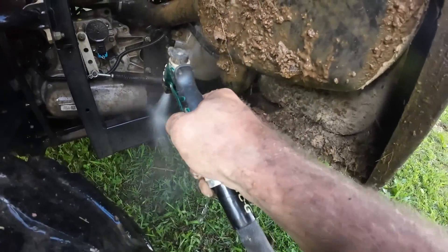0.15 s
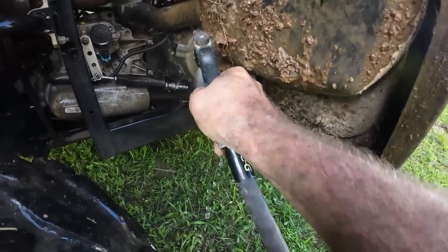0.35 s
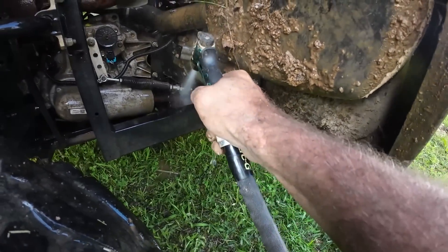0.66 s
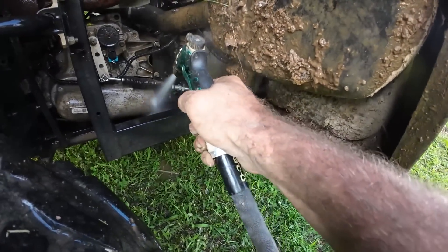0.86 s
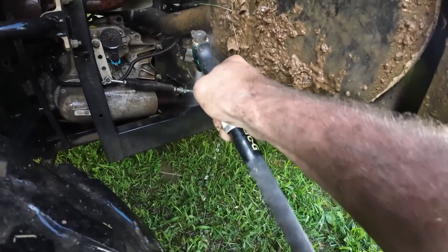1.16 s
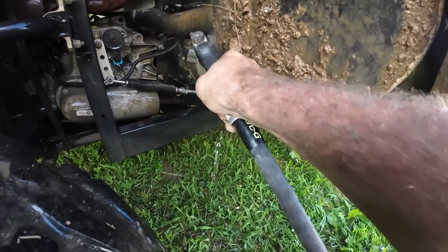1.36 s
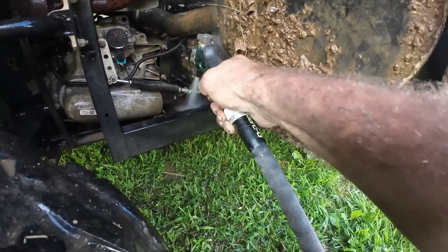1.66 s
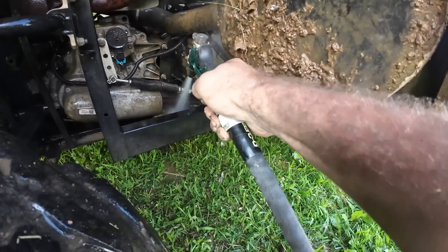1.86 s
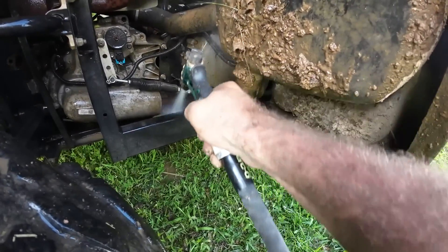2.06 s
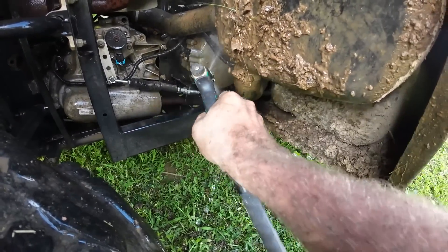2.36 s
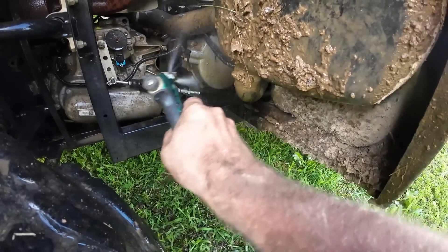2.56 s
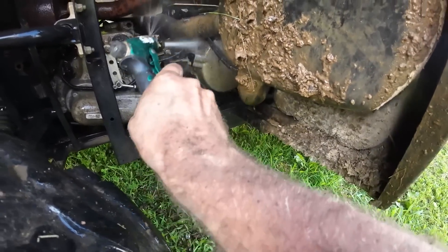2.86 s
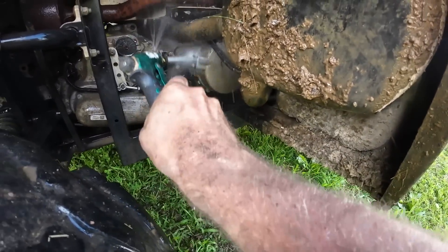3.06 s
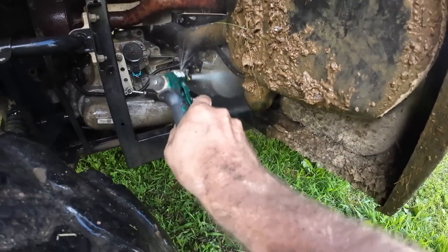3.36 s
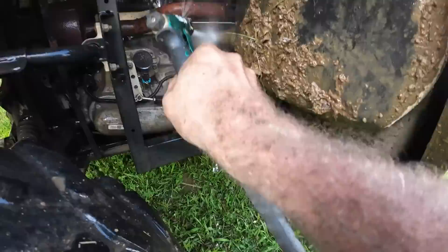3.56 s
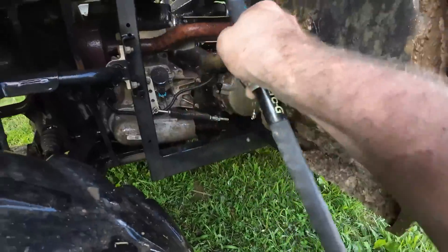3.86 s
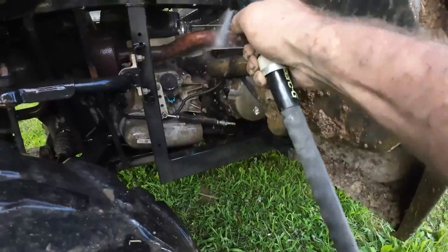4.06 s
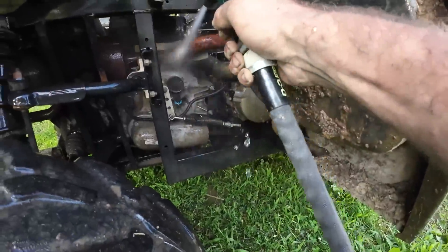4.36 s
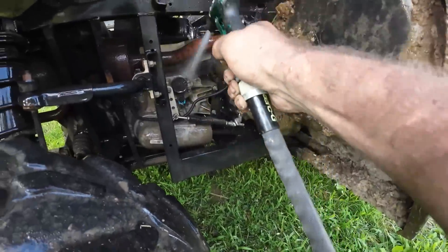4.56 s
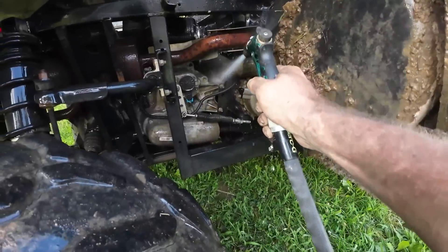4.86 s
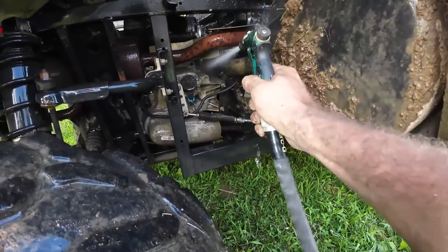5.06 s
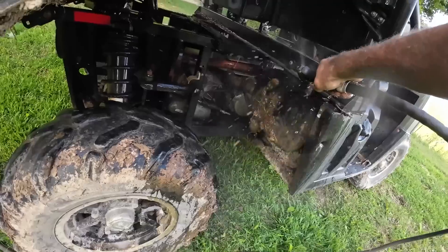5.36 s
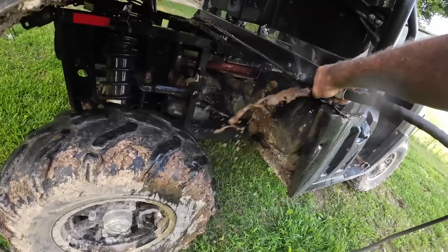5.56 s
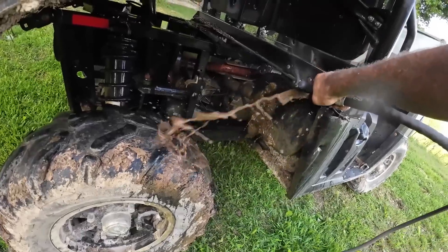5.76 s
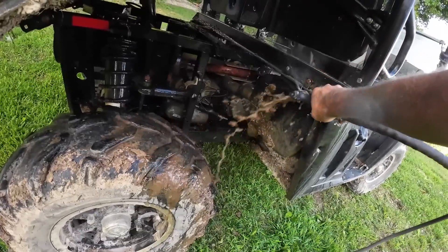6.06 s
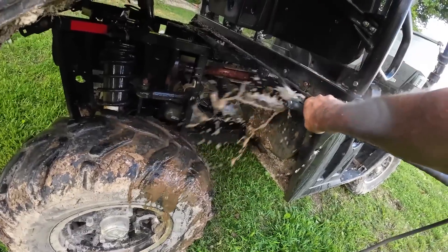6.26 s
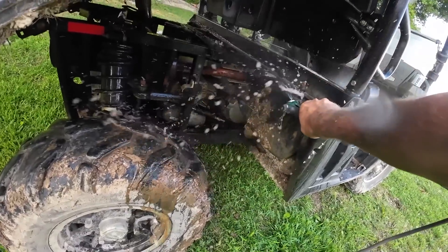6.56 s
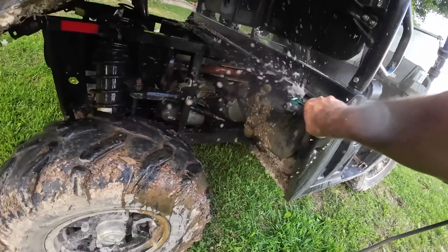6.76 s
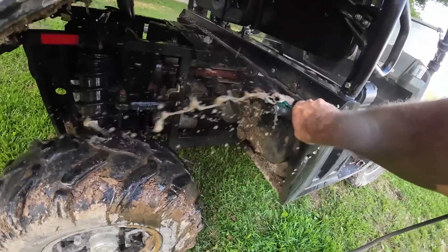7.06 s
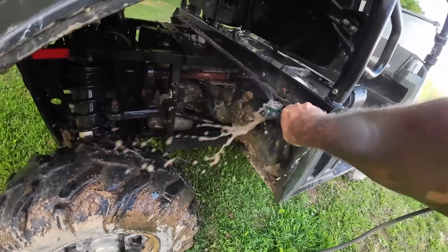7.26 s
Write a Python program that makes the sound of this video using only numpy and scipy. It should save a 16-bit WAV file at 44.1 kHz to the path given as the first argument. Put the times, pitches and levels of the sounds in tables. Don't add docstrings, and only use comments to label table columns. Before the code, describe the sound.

A hose nozzle jet hisses and drums loudly over a muddy vehicle frame outdoors, then turns softer and sputters as it sinks into mud.

```python
import sys
import numpy as np
from scipy import signal
from scipy.io import wavfile
from scipy.ndimage import uniform_filter1d

SR = 44100
rng = np.random.default_rng(int(sys.argv[2]) if len(sys.argv) > 2 else 0)


def wrap_up_sound(samples):
    columns = np.atleast_2d(samples).T
    tamed = np.clip(columns, -1, 1)
    steps = np.round(tamed * 32767).astype(np.int16)
    wavfile.write(sys.argv[1], SR, steps)


def to_linear_factor(level_db):
    exponent = np.asarray(level_db, float) / 20
    return 10 ** exponent


N = 326769
STEP_BACK_S = 5.301


def read(points, hz):
    f, value = np.transpose(points)
    return np.interp(np.log(hz + 1), np.log(f + 1), value)


def evened(x):
    return x / np.sqrt(np.mean(x ** 2) + 1e-20)


def by_place(pair, hz, t):
    close, far = read(pair[0], hz)[:, None], read(pair[1], hz)[:, None]
    return np.where(t < STEP_BACK_S, close, far)


def wander(samples):
    smooth = uniform_filter1d(rng.standard_normal(N), size=samples)
    return evened(uniform_filter1d(smooth, size=samples))


def bumps(rows, t):
    total = 0
    for middle, length, db in rows:
        phase = np.clip((t - middle) / max(length, .005), -1, 1)
        total = total + db * np.cos(np.pi / 2 * phase) ** 2
    return total


# t/s, mist level/dB, splash over mist/dB, drumming level/dB, part pitch f/Hz
JET_PATH = [(0.0, -21.5, 0, -27.5, 1220), (0.3, -20, -2, -28, 1100), (0.7, -21.5, -5.5, -32, 920),
            (1.25, -21.5, -2.5, -29, 1110), (1.62, -24.5, 1, -28.5, 1120), (2.2, -20.5, -3, -30.5, 1100),
            (3.0, -21, -1.5, -30.5, 1100), (3.8, -23, -1.5, -33, 1280), (4.3, -19, -2.5, -33, 980),
            (4.76, -24.5, 1, -31.5, 800), (5.2, -20.5, 0, -22, 1550), (5.31, -29.5, 0.5, -33.5, 1100),
            (5.86, -37.5, 7, -41.5, 1400), (6.41, -44.5, 8, -38, 1000), (6.47, -28, 2.5, -32, 1700),
            (6.81, -29, 0, -35, 1450), (6.98, -39.5, 13, -35, 1650), (7.2, -35, 7.5, -37, 1520)]


def aim(t, column):
    path = np.array(JET_PATH)
    close = path[path[:, 0] < STEP_BACK_S]
    far = path[path[:, 0] >= STEP_BACK_S]
    close_value = np.interp(t, close[:, 0], close[:, column])
    far_value = np.interp(t, far[:, 0], far[:, column])
    return np.where(t < STEP_BACK_S, close_value, far_value)


# middle t/s, length t/s, mist level/dB, share felt by steel
EDGES = [(0.338, 0.064, -7.5, 0.4), (0.452, 0.1, 1, 0), (0.653, .12, -2.5, 0.6), (.91, 0.033, -5.5, .2),
         (.98, 0.044, 2, 1), (1.046, 0.061, -9, 0.03), (1.08, 0.033, 4, 1), (1.19, 0.11, -4.5, .2),
         (1.453, 0.16, -5.5, 0.76), (1.736, .06, 3, 0), (1.99, 0.14, -0.5, 0.9), (2.175, 0.061, 3.5, 0.9),
         (2.334, 0.052, -8.5, 0.4), (2.455, 0.11, -3, 1.2), (2.551, .025, -4.5, .8), (2.58, 0.025, 5, 0.6),
         (2.832, 0.028, 4, 1), (2.935, 0.079, 3, 1), (3.04, .03, 2.5, 1), (3.083, 0.043, -7, 0.76),
         (3.233, 0.06, -2, 1.3), (3.322, 0.058, -7, 1), (3.508, 0.068, -5, 1), (3.722, 0.095, -5.5, .6),
         (3.902, 0.095, -5, 0.6), (4.025, 0.098, 1, 1.8), (4.08, 0.088, -4.5, 0), (4.102, 0.023, -4, 1),
         (2.688, .03, 2, 1), (4.4, 0.12, -4, 1), (4.583, 0.081, -4.5, 1), (4.684, 0.1, -2, 4)]
# middle t/s, length t/s, mist
# level/dB, # share felt by steel
MORE_EDGES = [(4.2, .03, 3.5, 0.7), (5.26, 0.06, -4, 1), (5.295, .015, -3, 1), (5.215, .018, -3, 1),
              (5.06, .015, -2, 1), (.63, .05, -1.5, 1), (3.18, .03, 2, 1), (2.68, .025, 2, 1),
              (4.49, .04, 3, .6), (3.42, .05, 2, 1), (6.495, .03, 2, 1), (6.98, .02, 2, 0.9),
              (5.41, 0.085, 4.5, 0), (5.52, .05, -1.5, 0), (5.93, 0.044, 8, 0.45), (7.24, .04, 7, 0.1),
              (5.984, 0.053, 10.5, 0.56), (6.166, 0.0092, 5, 0.2), (6.199, 0.013, 7, 0), (6.29, 0.099, 6.5, 0),
              (6.045, .012, -7, 1), (6.115, .022, -5, 0.9), (5.9, .03, 4, 0), (7.345, .018, -5, .5),
              (7.165, .012, -3, 1)]
# start t/s, end t/s, mist level/dB
LULLS = [
    (5.872, 6.165, -7),
    (5.9, 6.165, -6),
    (7.205, 8, -9),
    (7.253, 8, -8.5),
]
# middle t/s, length t/s, extra drumming level/dB, extra wind level/dB
REBOUNDS = [(0.17, 0.28, 2, 10), (0.703, 0.38, 1, 7), (0.96, 0.13, 5.5, 7), (1.223, 0.096, 5.5, -2),
            (1.897, 0.099, 3.5, -4), (2.145, 0.038, 4.5, 2), (2.237, 0.29, 3.5, 5), (2.64, 0.092, 0.5, 6.5),
            (2.976, 0.36, 3, 8.5), (3.425, 0.17, 4, 10), (3.615, 0.055, 4.5, -1), (3.973, 0.26, 5, -3.5),
            (4.235, 0.28, 5.5, 6.5), (4.515, .07, 3, 8.5), (4.866, 0.19, 5, -11), (5.312, 0.075, -3.5, 6),
            (5.7, 0.041, 3.5, 6), (6.3, 0.086, 3, 5.5), (7.07, 0.4, -1, 4)]


def levels():
    t = np.arange(0, N + 44, 44) / SR
    sink_s, return_s = 0.011, 0.01
    edge = bumps([row[:3] for row in EDGES + MORE_EDGES], t)
    felt = bumps([(s, length, db * share) for s, length, db, share in EDGES + MORE_EDGES], t)
    lull = 0
    for start, end, db in LULLS:
        sunk = np.clip((t - start) / sink_s, 0, 1) * np.clip((end - t) / return_s, 0, 1)
        lull = lull + db * sunk
    rebound_drum = bumps([row[:3] for row in REBOUNDS], t)
    rebound_wind = bumps([(s, length, db) for s, length, _, db in REBOUNDS], t)

    mist = aim(t, column=1) + edge + lull
    splash = aim(t, column=1) + aim(t, column=2) + felt + 0.99 * lull
    drum = aim(t, column=3) + 0.33 * felt + 0.61 * lull + rebound_drum
    wind = np.where(t < STEP_BACK_S, -38.5, -47.5)
    wind = wind + 0.46 * np.minimum(edge, 0) + 0.18 * lull + rebound_wind
    return [np.interp(np.arange(N) / SR, t, db) for db in (mist, splash, drum, wind)]


# f/Hz, likeness 0-1
PORT_LIKENESS = [
    [(60, 0.6), (130, 0.58), (290, 0.58), (640, 0.77), (1410, 0.86), (3100, 0.77), (6820, 0.65), (11000, 0.55), (15000, 0.45)],
    [(60, 0.43), (130, 0.93), (290, 1), (640, 0.95), (1410, 0.98), (3100, 0.82), (6820, 0.59), (15000, 0.6)],
]
# f/Hz, left over right level/dB
PORT_TILT = [
    [(60, -1.5), (200, 1), (2000, 1.9), (5500, 3.5), (7500, 1), (10000, 0), (12500, -14), (15500, 9)],
    [(60, 2.5), (700, 1), (1400, 0.5), (3000, 5.5), (6500, 2.7), (10000, -3.5), (15500, -1)],
]
# f/Hz, left lead/rad
PORT_LEAD = [
    [(60, -0.11), (5800, 0.47), (6700, -1), (8000, -0.56), (9600, -0.52), (11400, -0.93), (12600, -1.3), (16000, -1.1)],
    [(60, 0.16), (2800, 0.2), (6000, 0.83), (8000, 0.47), (9700, 1), (12000, 1.6), (16000, 2)],
]


def coloured(gusts, shape_db, size, patchy_db, glint_db):
    overlap = size * 3 // 4
    hz, t, (a, b) = signal.stft(rng.standard_normal((2, N)) * gusts, SR, nperseg=size, noverlap=overlap)
    patches, glints = rng.standard_normal((2, *a.shape))
    patches = uniform_filter1d(patches, size=size // 100 + 1, axis=0)
    patches = evened(uniform_filter1d(patches, size=int(5000 / size) + 1, axis=1))
    glints = evened(uniform_filter1d(glints, size=int(6000 / size) + 1, axis=1))
    gain = to_linear_factor(shape_db(hz, t) + patchy_db * patches + glint_db * np.maximum(glints, 0))
    gain /= np.sqrt((gain ** 2).mean(0))

    same = np.clip(by_place(PORT_LIKENESS, hz, t), 0, 1)
    lead = by_place(PORT_LEAD, hz, t)
    tilt = to_linear_factor(by_place(PORT_TILT, hz, t) / 2)
    left = a * tilt * np.exp(1j * lead)
    right = (same * a + np.sqrt(1 - same ** 2) * b) / tilt
    mean_power = (tilt ** 2 + tilt ** -2 + 2 * same * np.cos(lead)) / 4
    z = np.array([left, right]) * gain / np.sqrt(mean_power)
    sound = signal.istft(z, SR, nperseg=size, noverlap=overlap)[1][:, :N]
    return sound / np.sqrt(np.mean(gusts ** 2))


def droplets(per_s, spread_db):
    sizes = to_linear_factor(spread_db * np.minimum(rng.exponential(1, N), 2.6))
    sizes = sizes * (rng.random(N) < per_s / SR)
    puffs = signal.lfilter([1], [1, -np.exp(-1 / (0.0018 * SR))], sizes ** 2)
    return np.sqrt(1 + .5 * puffs / puffs.mean())


# f/Hz, width f/Hz, level/dB
STEEL = [(590, 200, 6), (770, 50, -4.5), (1100, 28, 7), (1245, 35, 0), (1400, 50, 4.5), (1586, 64, 7.5),
         (1800, 47, 12.5), (1950, 58, 12), (2390, 56, 3), (2650, 53, 12.5), (2845, 170, 5),
         (3240, 110, -1.5), (5500, 1900, 15.5)]


def steel_db(hz, modes=STEEL):
    return sum(db / (1 + (2 * (hz - f) / width) ** 2) for f, width, db in modes)[:, None]


# f/Hz, width f/Hz, level/dB
ARCH = [(567, 39, 13), (1300, 37, 7.5), (1680, 110, 3.5), (2440, 71, 6.5), (3050, 73, 3)]


def arch_db(hz, t):
    return steel_db(hz, ARCH) * (t >= STEP_BACK_S)


def ringing_db(hz, aim_hz, octaves, hump_db, ring):
    near = np.exp(-.5 * (np.log2((hz[:, None] + 1) / aim_hz) / octaves) ** 2)
    return near * hump_db + (0.13 + ring * near) * steel_db(hz)


# f/Hz, density level/dB
MIST = [
    [(4500, -22), (6500, -4.5), (8890, -0.5), (9860, 3.5), (11300, 3), (12800, -5), (13800, -5.5), (15000, 1.5), (15800, -3.5)],
    [(4500, -16), (6500, -15), (6950, 2.5), (8450, 4), (11400, 1.5), (12500, -4), (14000, -6), (15000, 1), (15900, -13)],
]
# f/Hz, density level/dB
SPLASH = [
    [(1180, -23.5), (2000, -10.5), (2980, -3), (3310, 1), (3820, -3), (5320, -2), (6790, -6.5), (7500, -3.5), (9750, -4), (16500, -120)],
    [(1180, -19.5), (2000, -7.5), (2400, -5.5), (2790, -3), (3840, 1.5), (4510, -5), (5440, -1), (7500, -9), (9750, -13), (16500, -120)],
]
# f/Hz, density level/dB
DRUMMING = [
    [(180, -7.5), (300, -6.5), (686, 0.5), (2070, -3.5), (2400, -1), (3120, -10), (5280, -120)],
    [(180, -14), (300, -8), (566, -11), (735, -6.5), (1650, -7.5), (1950, -9.5), (2400, -6.5), (3120, -37), (5280, -120)],
]


def spray(mist_db, splash_db, drum_db):
    gusts = to_linear_factor(0.6 * wander(samples=900) + 0.5 * wander(samples=250))
    gusts = gusts * droplets(per_s=500, spread_db=2.5)

    def mist_shape(hz, t):
        return by_place(MIST, hz, t)

    def splash_shape(hz, t):
        return by_place(SPLASH, hz, t) + 0.3 * steel_db(hz) + arch_db(hz, t)

    def drum_shape(hz, t):
        struck = ringing_db(hz, aim(t, column=4), octaves=0.33, hump_db=-0.5, ring=0.84)
        return by_place(DRUMMING, hz, t) + struck + arch_db(hz, t)

    mist = coloured(gusts, mist_shape, size=512, patchy_db=1.5, glint_db=2.2)
    splash = coloured(gusts, splash_shape, size=1024, patchy_db=1.5, glint_db=4.8)
    drumming = coloured(gusts, drum_shape, size=1024, patchy_db=2.0, glint_db=3.3)
    return to_linear_factor(mist_db) * mist + to_linear_factor(splash_db) * splash + to_linear_factor(drum_db) * drumming


# t/s, length t/s, f/Hz, level/dB
HUMS = [(0.029, 0.25, 3300, -24.5), (.33, 0.095, 1100, -26), (0.437, 0.096, 5500, -21),
        (1.18, 0.09, 1090, -21.5), (1.339, 0.33, 1060, -25), (1.384, 0.24, 1510, -27),
        (1.42, 0.27, 677, -27.5), (1.585, 0.053, 3360, -21), (1.6, 0.075, 2100, -22),
        (1.72, 0.15, 5000, -23), (1.828, .11, 1300, -22), (3.832, 0.19, 1470, -27.5),
        (2.126, 0.062, 3450, -23), (2.26, 0.17, 5500, -27.5), (2.357, 0.036, 1900, -26),
        (2.783, 0.053, 3500, -16.5), (3.62, 0.08, 2750, -27), (3.79, 0.27, 2950, -25),
        (4.043, 0.035, 1220, -20), (3.996, 0.091, 3030, -20), (4.696, 0.13, 5360, -20),
        (4.758, 0.17, 2080, -23.5), (4.798, 0.21, 575, -25), (4.99, 0.09, 1800, -20),
        (5.001, 0.31, 5500, -18.5), (5.099, 0.043, 1950, -24), (5.183, 0.12, 610, -26.5),
        (5.18, 0.063, 1820, -24), (5.194, 0.083, 5850, -22), (5.266, 0.03, 2000, -23)]
# t/s, length t/s, f/Hz, level/dB
POCKETS = [(5.307, 0.15, 3930, -26), (5.374, 0.11, 5300, -27), (5.523, 0.3, 5750, -29.5),
           (5.79, 0.07, 3550, -33), (6.159, 0.15, 5700, -38), (6.352, 0.095, 693, -34),
           (6.718, 0.19, 5300, -30), (6.902, 0.05, 2500, -25), (6.991, 0.1, 2400, -28),
           (6.92, 0.09, 3770, -27.5), (7.031, 0.11, 3800, -27), (7.16, 0.035, 3500, -27),
           (6.96, 0.05, 5300, -27), (7.11, 0.085, 6060, -24.5)]


def hums():
    out, t = np.zeros((2, N + 18000)), np.arange(18000) / SR
    noise = rng.standard_normal((len(HUMS + POCKETS), 2, 18000))
    for (s, length, hz, db), (both, apart) in zip(HUMS + POCKETS, noise):
        b, a = signal.iirpeak(hz, 5.2, SR)
        stereo = [both + 0.066 * apart, both - 0.044 * apart]
        hum = signal.lfilter(b, a, signal.lfilter(b, a, stereo))
        dwell = np.clip(t / 0.026, 0, 1) * np.clip((length + 0.013 - t) / 0.012, 0, 1)
        splutter = to_linear_factor(2.7 * evened(uniform_filter1d(apart, size=500)))
        start = round((s - .009) * SR)
        out[:, start:start + 18000] += to_linear_factor(db - 6.5) * dwell * evened(hum * splutter)
    return out[:, :N]


def whistles(rows, q, steady, rise_s):
    out, t = np.zeros((2, N + 18000)), np.arange(18000) / SR
    noise = rng.standard_normal((len(rows), 4, 18000))
    for (s, length, first_hz, last_hz, db), (a, b, c, d) in zip(rows, noise):
        hz = first_hz * (last_hz / first_hz) ** np.clip(t / length, 0, 1)
        r = np.exp(-np.pi * (first_hz + last_hz) / 2 / q / SR)
        both, apart = signal.lfilter([1], np.convolve([1, -r], [1, -r]), [a + 1j * b, c + 1j * d])
        both = both / (abs(both) + 1e-9) ** np.clip(steady, 0, 1)
        turn = np.exp(2j * np.pi * np.cumsum(hz) / SR)
        both, apart = evened((both * turn).real), evened((apart * turn).real)
        dwell = np.clip(t / rise_s, 0, 1) * np.clip((length - t) / rise_s + .5, 0, 1)
        stereo = both + 0.17 * np.array([apart, -apart])
        start = round(s * SR)
        out[:, start:start + 18000] += to_linear_factor(db) * dwell * stereo
    return out[:, :N]


# t/s, length t/s, first f/Hz, last f/Hz, level/dB
SWEEPS = [(6.39, .062, 950, 1150, -33), (6.395, .035, 2700, 3500, -35), (6.43, .024, 2396, 4200, -25),
          (6.452, .055, 4600, 5800, -31), (6.845, .05, 1597, 3190, -36), (6.9, .06, 2600, 3600, -32),
          (7.0, .14, 2600, 3410, -34), (7.06, .09, 4510, 6000, -34), (1.45, .13, 2597, 2900, -31),
          (1.57, .1, 2304, 3300, -31), (2.12, .045, 1500, 1350, -28), (5.035, .03, 1497, 2900, -24),
          (4.8, .2, 600, 620, -31), (4.0, .05, 5600, 5900, -25), (4.18, .17, 3300, 3300, -30),
          (5.31, .2, 3900, 3700, -35), (5.03, .045, 5700, 5600, -24), (5.25, .05, 5700, 5500, -26),
          (6.97, .04, 5200, 5500, -31), (7.16, .042, 5900, 6000, -32)]


def sweeps():
    return whistles(SWEEPS, q=2.1, steady=.3, rise_s=.004)


# t/s, length t/s, first f/Hz, last f/Hz, level/dB
RINGS = [(2.339, .04, 1090, 1090, -26), (1.21, 0.064, 1100, 1120, -28.5), (1.52, 0.049, 1540, 1550, -30),
         (1.51, 0.048, 660, 780, -34), (5.108, .045, 1960, 1970, -22.5), (5.0, .018, 2000, 2000, -25),
         (5.035, .04, 1770, 1950, -22), (5.192, 0.013, 1840, 1900, -23), (5.22, 0.019, 1760, 1800, -24),
         (5.272, 0.019, 2370, 2400, -26), (4.84, .06, 2120, 2100, -31), (5.19, 0.062, 620, 610, -31),
         (1.9, 0.013, 3350, 3350, -28), (2.8, .014, 3300, 3300, -28), (4.055, 0.019, 1220, 1250, -28),
         (.35, 0.035, 1080, 1090, -34), (.03, .25, 2400, 2380, -33), (.43, .11, 4150, 4100, -29),
         (2.73, .04, 2780, 2780, -29), (2.9, .04, 3400, 3400, -27), (5.5, .36, 3650, 3600, -39),
         (5.5, .36, 2480, 2450, -44), (6.47, .4, 1700, 1700, -39), (6.47, .4, 3650, 3600, -37)]


def rings():
    return whistles(RINGS, q=9., steady=0.55, rise_s=.005)


# t/s, peak level/dB, f/Hz, length t/ms
SPLATS = [(2.571, -5, 9800, 11.5), (4.0204, -1, 6000, 11), (4.06, -8, 5490, 16), (4.6239, -5.5, 5700, 26),
          (4.6544, -6, 5950, 21), (5.044, -6, 2890, 14), (5.197, -5.5, 5460, 11),
          (5.8944, -20.5, 5430, 8.9), (5.9665, -17.5, 7500, 11), (5.999, -18.5, 3260, 9.3),
          (6.019, -19, 3680, 6), (6.052, -24, 3570, 11), (6.081, -22, 3580, 9.4), (6.096, -20, 5500, 5.6),
          (6.138, -23, 5940, 7.9), (6.1575, -18.5, 5800, 9.2), (6.195, -22, 5790, 13),
          (6.2532, -21, 5740, 11), (6.2944, -15, 6130, 11), (6.3876, -19, 6020, 7), (6.4106, -20, 3180, 9),
          (6.433, -16, 2450, 7), (7.3013, -25, 3430, 12), (7.312, -24, 5500, 8), (7.3607, -24, 5500, 13),
          (7.3714, -21, 5640, 9.2), (7.3873, -19.5, 3700, 5.6), (7.4044, -24, 3600, 11),
          (4.012, -6, 5800, 6), (5.1363, -11, 1960, 6), (5.172, -9, 5400, 8), (5.8585, -19, 2600, 8),
          (6.1247, -26, 5820, 6), (6.214, -20, 5000, 5), (6.8527, -16, 5350, 20), (6.926, -14, 3000, 14),
          (7.214, -22, 5500, 6)]


def splats():
    out, t = np.zeros((2, N + 3000)), np.arange(3000) / SR
    noise = rng.standard_normal((len(SPLATS), 3, 3000))
    for (s, db, hz, ms), (both, left, right) in zip(SPLATS, noise):
        wide = signal.butter(2, [2800, min(2.0 * hz, 12000)], "bandpass", fs=SR)
        spatter = signal.lfilter(*wide, 0.39 * both + 0.58 * np.array([left, right]))
        ring = signal.lfilter(*signal.iirpeak(hz, 5.0, SR), both)
        shape = np.minimum(t / 0.00071, 1) * np.exp(-(t / (max(ms, 1) / 1000)) ** 2)
        splat = 0.96 * evened(spatter) + 0.55 * evened(ring)
        start = round(s * SR)
        out[:, start:start + 3000] += to_linear_factor(db - 13) * shape * splat
    return out[:, :N]


# f/Hz, density level/dB
WIND = [
    [(0, 3.5), (22, 3.5), (40, -1.5), (135, -6), (380, -9), (520, -10), (880, -100)],
    [(0, -2), (25, -1), (60, -13.5), (180, -11), (380, -19), (520, -53), (880, -100)],
]


def buffet(wind_db):
    lumps = to_linear_factor(0.68 * wander(samples=2500))
    wind = coloured(lumps, lambda hz, t: by_place(WIND, hz, t), size=2048, patchy_db=-1.3, glint_db=0.5)
    return to_linear_factor(wind_db) * wind


def hiss(level_db):
    both, left, right = rng.standard_normal((3, N))
    highpass = signal.butter(1, 3000., "highpass", fs=SR)
    return to_linear_factor(level_db) * signal.lfilter(*highpass, 0.7 * both + 0.7 * np.array([left, right]))


def scene():
    mist_db, splash_db, drum_db, wind_db = levels()
    wet = spray(mist_db, splash_db, drum_db)
    wet = wet + hums() + sweeps() + rings() + splats()
    return wet + buffet(wind_db) + hiss(level_db=-57)


def roll_off(x):
    return signal.sosfilt(signal.butter(12, 15850, fs=SR, output="sos"), x)


def record(dry):
    return roll_off(dry)


dry = scene()
out = record(dry)
wrap_up_sound(out)
```